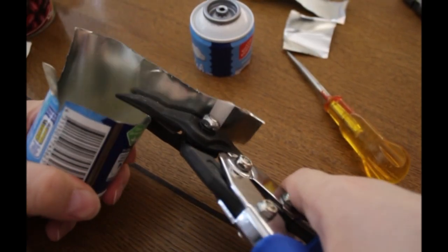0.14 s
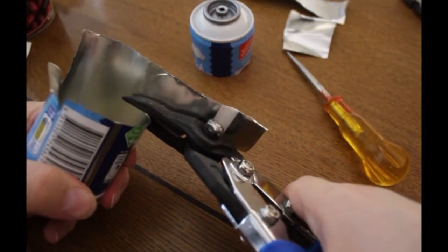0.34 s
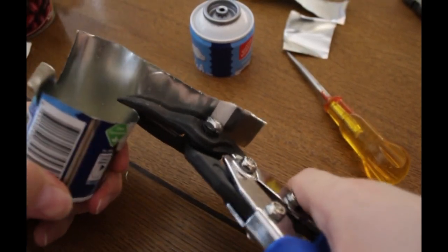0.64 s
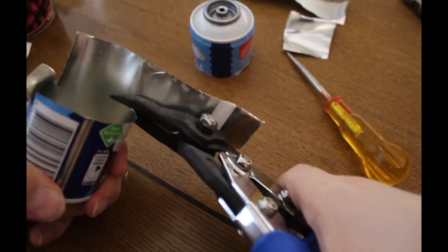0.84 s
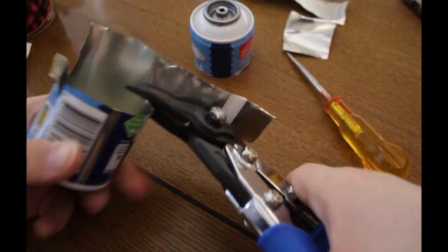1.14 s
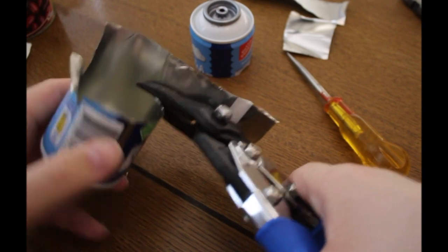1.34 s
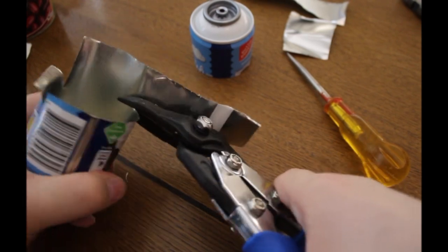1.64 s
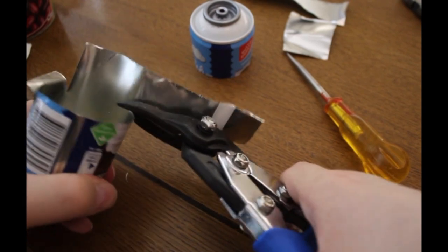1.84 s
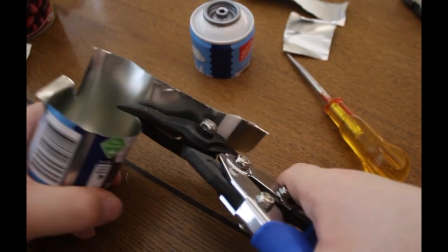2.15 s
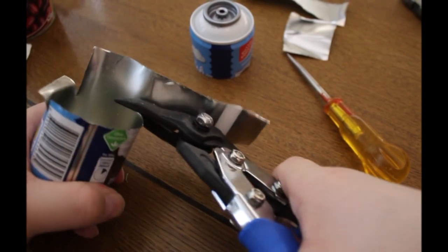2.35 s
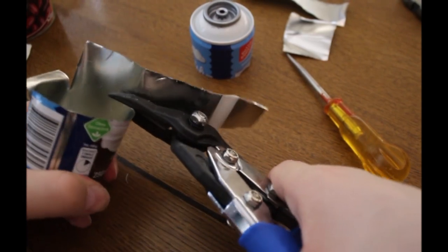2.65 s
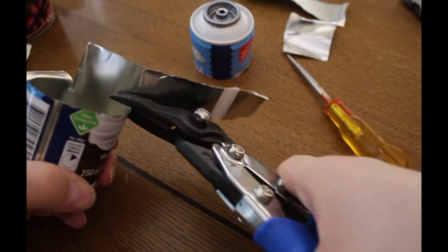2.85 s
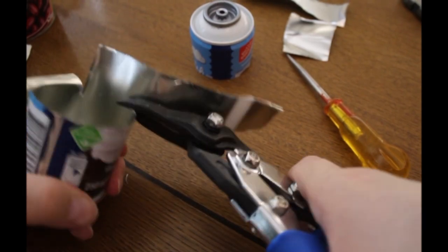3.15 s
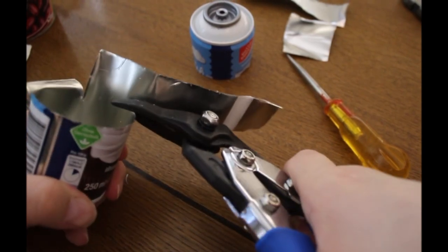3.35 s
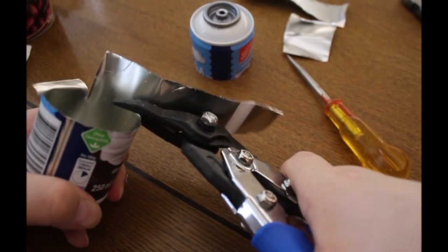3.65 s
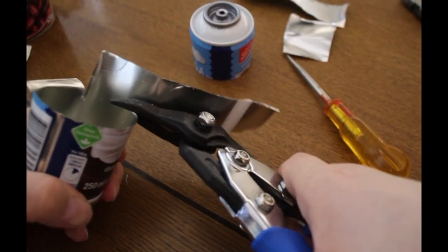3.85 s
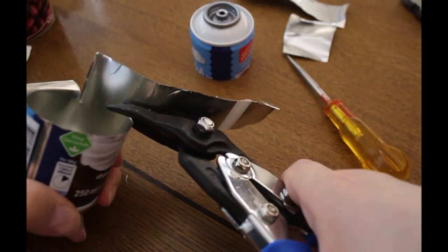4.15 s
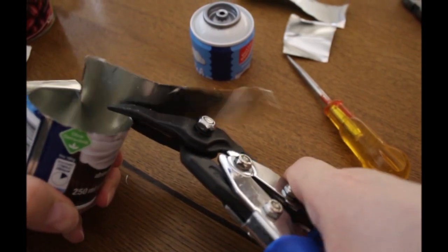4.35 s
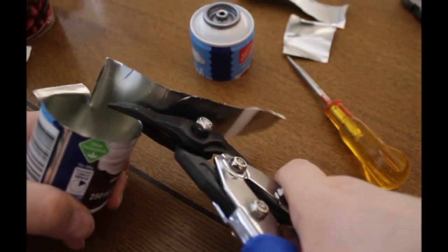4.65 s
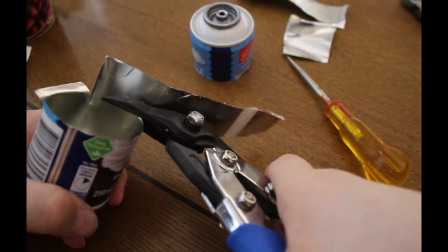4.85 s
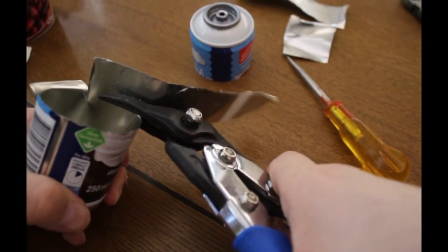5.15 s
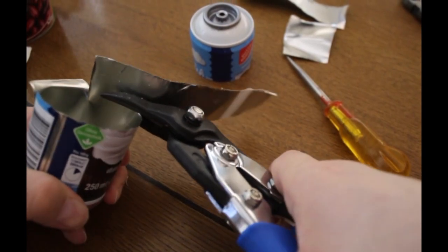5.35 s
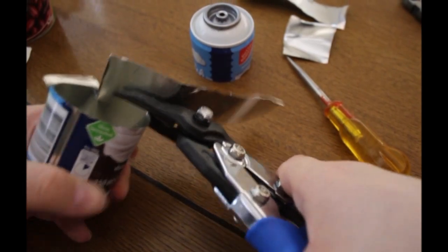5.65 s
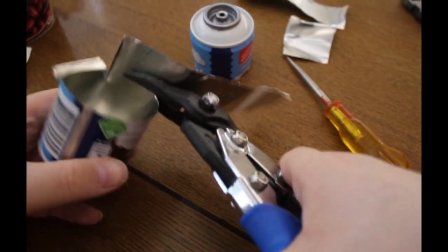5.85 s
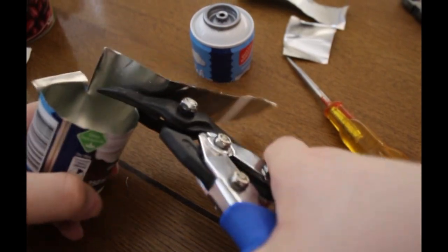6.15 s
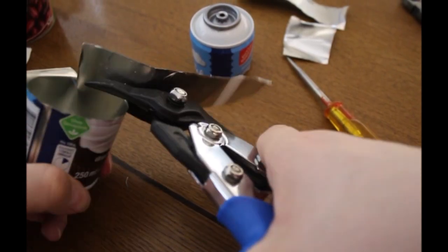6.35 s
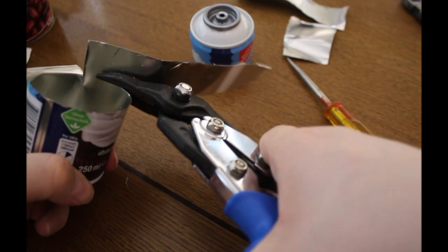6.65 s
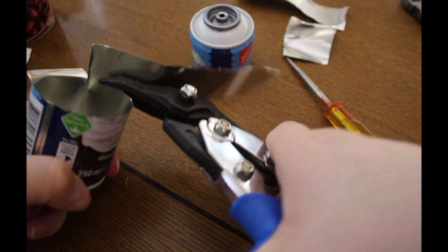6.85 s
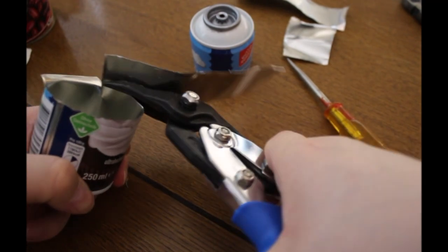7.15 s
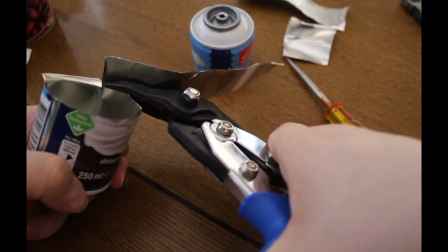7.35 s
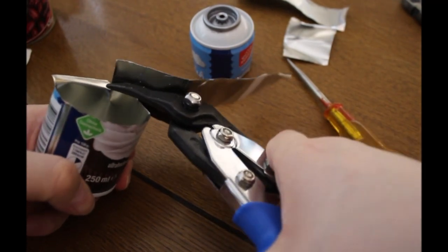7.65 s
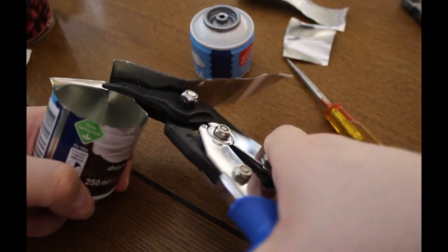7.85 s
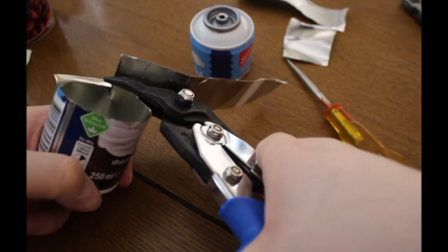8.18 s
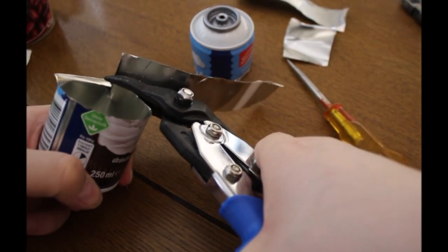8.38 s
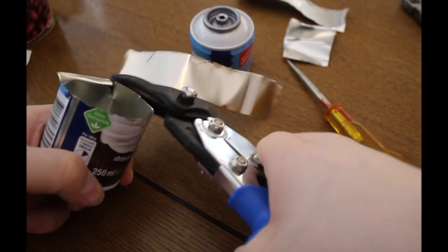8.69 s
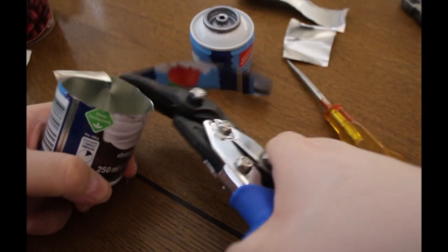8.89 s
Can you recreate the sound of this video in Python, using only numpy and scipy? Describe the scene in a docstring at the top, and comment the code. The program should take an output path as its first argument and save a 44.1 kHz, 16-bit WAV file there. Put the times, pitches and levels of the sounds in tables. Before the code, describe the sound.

Thin sheet metal buckles and tears under hand snips: damped mid-pitched tinny pops, dry crinkles and a few bright cracks, unevenly spaced. Light steel ticks and dull wooden knocks sit between. One hard metallic snap lands halfway; a last loud crack frees a strip that rattles briefly. Close stereo pickup, slightly right, short room reverberation, very quiet room tone.

```python
"""A small room, close over a wooden table: tin snips cut round the thin wall of a metal can.
A stereo microphone hears the wall pop and crunch, as damped panel tones, noise bursts and runs of slips.
The pivot ticks, the jaws snap and the table is bumped softly: struck modes with short noise.
At the end the cut strip breaks free and clatters down, its fluttering modes driven by chatter.
Rubbing on the hollow can, a short reverberation and quiet room tone lie behind the work."""
import sys
import numpy as np
from scipy import signal
from scipy.fft import rfft, irfft, next_fast_len
from scipy.io import wavfile
from scipy.ndimage import map_coordinates

SR = 44100
rng = np.random.default_rng(int(sys.argv[2]) if len(sys.argv) > 2 else 0)


def materialize(psi):
    """Save the field psi as 16-bit PCM at rate SR to the path in sys.argv[1].

    A 1-D psi becomes a single channel; in a 2-D psi each row is a channel.
    """
    bounded = np.clip(np.atleast_2d(psi).T, -1, 1)
    quanta = np.round(bounded * 32767).astype(np.int16)
    wavfile.write(sys.argv[1], SR, quanta)


N = 397782

# All levels in the tables are relative; each source sets its own balance.
# Spectrum of the room tone: pitch_hz, level_db
AIR_SPECTRUM = [(15, -38.5), (25, -22), (97, -1), (384, -4), (734, -7), (936, -10), (1890, -10.5),
                (2220, -11), (4740, -12.5), (16000, -25)]
# Width of the room tone: pitch_hz, side_db (side against mid)
AIR_WIDTH = [(60, 0.5), (240, 3.5), (950, 6.5), (3770, 2), (15000, 0.5)]
# Decay of the reverberation: pitch_hz, t60_s
ROOM_DECAY = [(200, 0.54), (600, 0.29), (1400, 0.19), (4000, 0.28), (9000, 0.26), (15000, 0.24)]
# Width of the reverberation: pitch_hz, side_db
ROOM_WIDTH = [(100, -11.5), (1000, -11.5), (3000, -5), (8000, -4.5)]
# Stereo lean of the work: pitch_hz, left_minus_right_db
STEREO_LEAN = [(100, -8.5), (600, -5.5), (1300, -4.5), (2500, -3.5), (5000, -0.5), (12000, -1)]
# Microphone response to the work: pitch_hz, gain_db
MIC_RESPONSE = [(60, -1), (300, 8), (700, 1.5), (1300, -0.5), (2200, 1), (3300, 0), (4500, -0.5), (6000, 0),
                (9500, -4.5), (12000, -7.5), (15500, -8.5)]

# How strongly the hand rubs the can: time_s, level_db
RUBBING_LEVEL = [(0.0, -66), (.31, -64), (1.48, -66.5), (1.75, -58), (4.58, -64.5), (5.51, -74.5),
                 (7.19, -59), (8.6, -100)]
# Resonances of the open can that colour the rubbing: pitch_hz, width_hz, level_db
CAN_HOLLOW = [(1312, 240, 15), (1410, 580, -8)]
# Knocks passed to the table: start_s, level_db
TABLE_BUMPS = [(.946, -55), (2.049, -53), (2.527, -53), (3.587, -56), (4.247, -55), (4.543, -49),
               (4.79, -51), (6.147, -52), (6.296, -61.5), (8.928, -60)]
# Modes of the table top: pitch_hz, level_db, t60_s
TABLE_MODES = [(124, -16, 0.22), (194, -1.5, 0.2), (265, -26, 0.083), (324, -9, 0.057), (433, 1.5, 0.086),
               (605, -10.5, 0.061), (875, -7, 0.11)]

# The opening blades slide along the cut edge, one row: start_s, end_s, level_db
BLADE_SLIDE = (2.46, 2.87, -69)
# Resonances of the sliding steel: pitch_hz, width_hz, level_db
BLADE_RESONANCES = [(2350, 190, -8), (2930, 240, 4)]
# The pivot slips as the jaws open: start_s, level_db
PIVOT_TICKS = [(1.548, -35.5), (1.568, -40), (1.634, -42.5), (1.679, -41.5), (1.743, -42), (1.804, -42.5),
               (1.834, -41.5), (1.860, -38)]
# Modes of the pivot: pitch_hz, level_db, t60_s
PIVOT_MODES = [(2996, 11, 0.024), (3590, 4, 0.08), (3870, 0, .1), (4300, -1, 0.084), (4440, -3, 0.11),
               (5500, -16, 0.11), (6020, -12, 0.16), (6900, -17, 0.1), (8250, -6, 0.16)]
# The jaws snap past each other: start_s, level_db
JAW_SNAPS = [(5.1243, -13.5)]
# Modes of the jaws: pitch_hz, level_db, t60_s
JAW_MODES = [(2160, -12, .22), (2895, -3, .1), (3120, -4, .16), (4290, -5, .16), (4930, -3, .16),
             (5240, -5, .14), (5800, -6, .13), (5960, 1, .15)]

# The loose strip brushes the blades, then scrapes and lands:
# start_s, level_db, chatter_s, most_excited_hz, rattle_db, rattle_top_hz
STRIP_CONTACTS = [(7.571, -45, .008, 2900, -4, 4980), (7.548, -47, .025, 800, -6, 3000),
                  (8.638, -41, .014, 6051, -1, 7000), (8.63, -50, 0.056, 2440, 9, 4000),
                  (8.8565, -29, .016, 4280, 5, 9000), (8.864, -24.5, .016, 2896, -5, 9000),
                  (8.927, -31.5, .014, 790, 3.5, 3960), (8.93, -32, .028, 9300, 2, 9000),
                  (8.968, -34, .04, 3700, 4, 4970)]
# Modes of the strip: pitch_hz, level_db, t60_s
STRIP_MODES = [(792, -9, .26), (2430, -3, 0.091), (2893, 1, .13), (3030, -7, .1), (3225, -7, .12),
               (3600, 2, 0.18), (3830, -3, .15), (4300, -2, 0.19), (5400, -3, .08), (6051, -1, .11),
               (6300, -10, .2), (8290, 3, .11), (10440, 4, .11)]

# Each squeeze chews through the sheet: start_s, end_s, level_db, crackle_db (against that level)
SQUEEZES = [(0.301, 0.354, -46.5, -8.5), (0.722, 0.795, -55.5, -9), (1.082, 1.164, -69, 1),
            (1.926, 2.026, -53.5, -25), (2.128, 2.186, -51.5, -15), (2.177, 2.27, -49.5, -6.5),
            (2.95, 3.039, -51.5, -8.5), (3.148, 3.267, -44, -9), (3.283, 3.348, -49.5, -10),
            (4.462, 4.589, -52, -11), (4.767, 4.867, -47, -10.5), (6.146, 6.197, -43, -10),
            (6.331, 6.644, -66.5, -6.5), (6.961, 7.029, -47, 4.5), (7.059, 7.236, -55, -2.5),
            (7.467, 7.585, -57, 1), (7.66, 7.717, -54, -2), (7.941, 8.017, -43, 3), (8.13, 8.264, -69, -10),
            (8.753, 8.852, -56, 6)]
# The wall pops, loud and faint: start_s, level_db, pitch_hz, sharpness_db (crack against panel)
WALL_POPS = [(0.1491, -7, 1200, -19.5), (.2991, -14, 1718, -16.5), (0.3106, -14, 1676, -21),
             (0.4374, -24, 1560, -23), (.354, -34, 1710, -20), (.451, -35, 1600, -20),
             (.466, -37.5, 1580, -13), (0.5579, -24.5, 1510, -20.5), (.5655, -29.5, 1515, -19.5),
             (.779, -36, 1250, -14.5), (.8048, -8.5, 1317, -1), (0.8208, -34, 1320, -11),
             (1.1782, -30, 1350, -4.5), (1.4124, -39.5, 1870, -3.5), (1.642, -25, 1500, -24),
             (1.698, -25, 1460, -24.5), (1.7638, -21.5, 1480, -25), (1.772, -27, 1460, -17),
             (1.8975, -27, 1400, 1.5), (1.923, -16.5, 1586, 0.5), (1.9578, -12, 1470, -28),
             (1.966, -25, 1390, -23), (1.982, -24.5, 1410, -21), (2.022, -34, 1300, -25),
             (2.1811, -24.5, 1264, -24), (2.1973, -19.5, 1324, -21), (2.244, -30.5, 1280, -24),
             (2.326, -45, 1248, -23), (2.407, -43.5, 1160, -19), (2.6392, -31, 1394, -25.5),
             (2.682, -39.5, 1410, -24), (2.8439, -25.5, 1290, -21.5), (2.8757, -19.5, 1314, -19.5),
             (2.8936, -22.5, 1246, -27), (2.9594, -17, 1330, -15), (2.9974, -19, 1640, -29),
             (3.1464, -25, 1342, -4.5), (3.1599, -23, 1315, 0), (3.196, -16.5, 1370, -20),
             (3.203, -20, 1400, -20), (3.218, -18, 1220, -23), (3.227, -21, 1350, -21),
             (3.251, -18, 1315, -31), (3.3638, -31.5, 1290, -18), (3.483, -30.5, 1230, -21.5),
             (3.5986, -20.5, 1345, -27), (3.6094, -25.5, 1340, -16.5), (4.027, -28.5, 1200, -8.5),
             (4.106, -24.5, 1740, -10.5), (4.125, -21, 1520, -12.5), (4.239, -14, 1320, -24),
             (4.2452, -17.5, 1397, 2.5), (4.4505, -17, 1605, -19.5), (4.5, -29, 1380, -19),
             (4.554, -31.5, 1450, -17.5), (4.611, -37.5, 1704, -16.5), (4.755, -29.5, 1643, -21.5),
             (4.7654, -22, 1310, -22), (4.797, -12, 1430, -15), (5.4118, -38, 1510, -23),
             (5.584, -29.5, 1500, -22), (5.5988, -33.5, 1480, -12.5), (5.812, -43.5, 1410, -12),
             (5.845, -40.5, 1550, -27), (6.1309, -28.5, 1620, -20), (6.14, -16.5, 1360, -47),
             (6.1481, -18.5, 1594, -8), (6.1814, -19, 1303, -20.5), (6.4973, -34, 1275, -10.5),
             (6.6005, -21.5, 1556, -16.5), (6.605, -22.5, 1575, -12.5), (6.76, -33, 1560, -14.5),
             (6.9556, -10, 1466, -1), (6.9625, -22, 1437, -12), (7.0644, -17.5, 1356, -18),
             (7.1363, -29, 1550, -20.5), (7.1699, -22, 1607, -8.5), (7.196, -30.5, 1550, -15),
             (7.2537, -32, 1460, -15.5), (7.4672, -25, 1514, -21), (7.4776, -29.5, 1390, -6.5),
             (7.5047, -26, 1410, -17), (7.519, -35, 1300, -18), (7.534, -29, 1465, -6),
             (7.5451, -31, 1400, -5.5), (7.636, -38.5, 1230, -10), (7.664, -36.5, 1360, -6),
             (7.673, -32, 1720, -20), (7.6888, -20, 1303, -24), (7.698, -28, 1280, -16),
             (7.7733, -35, 1304, -24), (7.898, -32.5, 1697, -25), (7.909, -33, 1550, -4),
             (7.926, -32.5, 1390, -18), (7.94, -19, 1575, -6.5), (7.9615, -19.5, 1253, -5.5),
             (8.0457, -26.5, 1711, -19.5), (8.403, -40, 1550, -20), (8.428, -40, 1410, -22),
             (8.444, -36, 1536, -22), (8.7429, -9.5, 1717, -2.5), (8.83, -30, 1770, -20)]
# Modes of the can: pitch_hz, level_db, t60_s
WALL_MODES = [(814, -3.5, 0.19), (1185, -3, 0.22), (1280, -5, 0.28), (1417.5, 1.5, 0.088), (1745, -4, 0.18),
              (2480, -12.5, 0.187), (2805, 0, 0.24), (3340, 5, 0.22), (3790, 7, .17)]
# How freely the holding hand lets the can ring: time_s, ring_db
HAND_FREEDOM = [(.15, 4), (.45, -4.5), (.8, -1.5), (1.18, 19), (1.6, 3), (6.15, 4), (7, 6), (8.75, 3.5)]

# Crinkles, the small buckles within a squeeze
CRINKLE_RATE = 35  # per second of squeezing
CRINKLE_DB, CRINKLE_SPREAD_DB = 14.5, 3.5  # over the level of the squeeze
CRINKLE_HZ, CRINKLE_SPREAD_OCT = 1437, 0.15  # panel pitch
CRINKLE_SHARP_DB = -11  # sharpness over the crackle of the squeeze

# Strain and tear around a sharp pop; levels against the pop
TEAR_SHARP_DB = -5  # sharpness above which a pop tears the sheet
STRAIN_S, STRAIN_DB, STRAIN_CRACKLE_DB = 0.027, -43, -6.5
TEAR_DELAY_S, TEAR_S, TEAR_DB, TEAR_CRACKLE_DB = 0.012, 0.11, -43.5, -2

EDGE_KNEE_DB = -12.5  # sharpness from which the blade edge speaks fully
PUSH_HZ, PUSH_DB_PER_OCT = 1420, -17  # panels above this pitch push less air
TOP_HZ = 16000  # band limit
T = np.arange(SR * 2 // 5) / SR  # time within one hit, s


def amp(db):
    """Decibels to gain."""
    return 10 ** (np.asarray(db) / 20)


def unit(x):
    """Scale to rms 1."""
    return x / np.sqrt(np.mean(x ** 2) + 1e-20)


def along(points, hz):
    """Read (Hz, value) points on a log frequency axis."""
    f, v = np.transpose(points)
    return np.interp(np.log(hz + 1), np.log(f), v)


def fade(t60, t=T):
    """Exponential decay, 60 dB down after t60 seconds."""
    return np.exp(-np.log(1000) * t / t60)


def add(track, s, sound):
    """Mix a sound into a track at time s."""
    part = track[max(round(s * SR), 0):][:len(sound)]
    part += sound[:len(part)]


def filtered(x, response):
    """Multiply the spectrum of x by a response of frequency."""
    m = next_fast_len(N + SR // 2)
    return irfft(rfft(x, m) * response(np.fft.rfftfreq(m, 1 / SR)), m)[..., :N]


def band(x, lo_hz, hi_hz, order=2):
    """Causal band-pass."""
    edges = [lo_hz, min(hi_hz, SR / 2 - 100)]
    return signal.sosfilt(signal.butter(order, edges, 'band', fs=SR, output='sos'), x)


def bursts(lo_hz, hi_hz, t60, count, order=2):
    """Rows of dying band noise, each starting near rms 1."""
    shape = fade(t60)[:SR // 10]
    noise = band(rng.standard_normal((count, len(shape))) * shape, lo_hz, hi_hz, order=order)
    return noise * np.linalg.norm(shape) / np.linalg.norm(noise, axis=1, keepdims=True)


def ring(modes, scatter_db=2, pitch_scatter=0.0015):
    """An object's modes, struck at new strengths, each pitch varied slightly at random."""
    hz, db, t60 = np.transpose(modes)[..., None]
    gain = amp(db + scatter_db * rng.standard_normal(hz.shape)) * rng.choice([-1, 1], hz.shape)
    hz = hz * (1 + pitch_scatter * rng.standard_normal(hz.shape))
    tones = np.sin(np.float32(2 * np.pi * hz * T))
    return np.sum(gain * tones * fade(t60), axis=0)


def near(modes, centre_hz, focus_db):
    """Modes lose focus_db for each octave away from the excited pitch."""
    return [(hz, db - focus_db * abs(np.log2(hz / centre_hz)), t60) for hz, db, t60 in modes]


def resonances(peaks, f):
    """Causal response of (Hz, width Hz, dB) peaks."""
    return sum(amp(db) * 1j * f * w / (c * c - f * f + 1j * f * w) for c, w, db in peaks)


def slips(length, rate, spread_db, taper=0.248):
    """A run of tiny irregular impulses with soft ends, rms 1."""
    n = max(int(length * SR), 64)
    hits = rng.random(n) < rate / SR
    hits[n // 2] = True  # at least one slip
    signs = rng.choice([-1, 1], n)
    sizes = amp(spread_db * rng.standard_normal(n))
    return unit(hits * signs * sizes * signal.windows.tukey(n, taper))


def driven(force, response):
    """A body's answer to a force, at the force's energy."""
    sound = signal.fftconvolve(force, response)
    return sound * np.linalg.norm(force) / np.linalg.norm(sound)


def waver(rate, depth_db):
    """A smooth random gain over one hit, with rate knots a second."""
    knots = rng.standard_normal(int(T[-1] * rate) + 4)
    return amp(depth_db * map_coordinates(knots, [T * rate]))


def room_tone(mid_db=-66):
    """Steady quiet air and hiss: shaped noise, independent in mid and side."""
    noise = rng.standard_normal((2, N))
    mid, side = unit(filtered(noise, lambda f: amp(along(AIR_SPECTRUM, f))))
    side = filtered(side, lambda f: amp(along(AIR_WIDTH, f)))
    return amp(mid_db) * np.array([mid + side, mid - side])


def room(x, early_db=5, early_side_db=-2, early_t60=0.082, gap_s=0.0021, count=45):
    """Table and walls answer with decaying noise tails, narrow at first and wider later."""
    out = np.zeros((2, N))  # mid, side
    early = amp([[early_db], [early_side_db]]) * fade(early_t60)
    onset = np.clip(T / gap_s - 1, 0, 1) * (1 + early)
    for piece in np.array_split(np.arange(N), count):  # a new random tail for each equal stretch of time
        hz, t, z = signal.stft(rng.standard_normal((2, len(T))), SR, nperseg=256)
        decay = fade(along(ROOM_DECAY, hz)[:, None], t)
        tails = signal.istft(z * decay, SR, nperseg=256)[1][:, :len(T)] * onset
        for track, tail in zip(out, tails):
            add(track, piece[0] / SR, signal.fftconvolve(x[piece], tail / np.linalg.norm(tail)))
    side = filtered(out[1], lambda f: amp(along(ROOM_WIDTH, f)))
    return np.array([out[0] + side, out[0] - side])


def rubbing(level_db=-5):
    """Fingers and blades rub faintly on the hollow can: noise through its resonances."""
    db = np.interp(np.arange(N) / SR, *np.transpose(RUBBING_LEVEL))
    noise = filtered(rng.standard_normal(N), lambda f: resonances(CAN_HOLLOW, f))
    return amp(db + level_db) * unit(noise)


def table(wood_db=-4, thud_db=-2):
    """Soft contacts give a broad thud and briefly ring the table top."""
    out = np.zeros(N)
    thuds = bursts(260, 760, 0.14, count=len(TABLE_BUMPS))
    for (s, db), thud in zip(TABLE_BUMPS, thuds):
        soft_start = 1 - fade(0.022)
        add(out, s, amp(db + wood_db) * ring(TABLE_MODES) * soft_start)
        add(out, s, amp(db + thud_db) * thud)
    return out


def sliding(rate=1800, spread_db=3):
    """Fine slips of a blade along the cut edge sound the steel's resonances."""
    start, end, db = BLADE_SLIDE
    force = np.zeros(N)
    add(force, start, amp(db) * slips(end - start, rate, spread_db))
    sound = filtered(force, lambda f: resonances(BLADE_RESONANCES, f))
    return sound * np.linalg.norm(force) / np.linalg.norm(sound)


def pivot_ticks(ring_db=-13, crack_db=-7.5):
    """Steel slips on steel at the pivot: a short crack and the tool's ring."""
    out = np.zeros(N)
    cracks = bursts(1100, 9400, 0.035, count=len(PIVOT_TICKS))
    for (s, db), crack in zip(PIVOT_TICKS, cracks):
        add(out, s, amp(db + ring_db) * ring(PIVOT_MODES))
        add(out, s, amp(db + crack_db) * crack)
    return out


def jaw_snaps(ring_db=-22, clack_db=-3, crack_db=-5, zing_db=-15):
    """The snapping blades crack, clack and ring; their crowded modes leave a noisy zing."""
    out, count = np.zeros(N), len(JAW_SNAPS)
    cracks = bursts(3940, 14000, 0.056, count=count, order=1)
    clacks = bursts(4800, 6000, 0.018, count=count, order=3)
    zings = bursts(4800, 6040, 0.1, count=count, order=4)
    for (s, db), crack, clack, zing in zip(JAW_SNAPS, cracks, clacks, zings):
        add(out, s, amp(db + ring_db) * ring(JAW_MODES, scatter_db=4))
        noise = amp(crack_db) * crack + amp(clack_db) * clack + amp(zing_db) * zing
        add(out, s, amp(db) * noise)
    return out


def strip(ring_db=-3, rattle_db=-5, body_db=-17, focus_db=10, focus_oct=.09, far_db=5,
          rate=1500, flutter_rate=170, flutter_db=3):
    """The strip chatters; where it touches decides which mode leads, and flexing makes each flutter."""
    out = np.zeros(N)
    for s, db, length, centre_hz, rattle, top_hz in STRIP_CONTACTS:
        sheet, = bursts(1640, top_hz, 0.042, count=1, order=1)
        body, = bursts(700, 2200, 0.049, count=1, order=3)
        force = amp(db) * slips(length, rate, spread_db=4.5)
        tone = 0
        for mode in near(STRIP_MODES, centre_hz, far_db):
            octaves_off = np.log2(mode[0] / centre_hz)
            lead = amp(focus_db * np.exp(-(octaves_off / focus_oct) ** 2))
            tone = tone + lead * ring([mode], scatter_db=0) * waver(flutter_rate, flutter_db)
        tone = tone * (1 - fade(2 * length))  # builds while the chatter lasts
        add(out, s, amp(ring_db) * tone * np.linalg.norm(force) / np.linalg.norm(tone))
        bend = amp(body_db) * np.sqrt(3000 / centre_hz)  # broad, low contacts bend the whole strip
        rattling = amp(rattle_db) * driven(force, sheet) + bend * driven(force, body)
        add(out, s, amp(rattle) * rattling)
    return out


def tears():
    """Around each of the sharpest pops the sheet strains, then tears on; rows as in SQUEEZES."""
    rows = []
    for s, db, hz, sharp in WALL_POPS:
        if sharp > TEAR_SHARP_DB:
            rows.append((s - STRAIN_S, s, db + STRAIN_DB, STRAIN_CRACKLE_DB))
            start = s + TEAR_DELAY_S
            rows.append((start, start + TEAR_S, db + TEAR_DB, TEAR_CRACKLE_DB))
    return rows


def cutting(cuts, rate=220, spread_db=5, crackle_rate=1500, crackle_spread_db=4,
            body_db=-2, push_db=-9, edge_db=-2, crackle_db=-5):
    """Shearing is a run of slips that shake the wall, with a much finer crackle at the blade."""
    out, count = np.zeros(N), len(cuts)
    bodies = bursts(1114, 1850, 0.011, count=count, order=3)
    pushes = bursts(483, 1045, 0.0069, count=count, order=3)
    edges = bursts(2630, 6100, 0.009, count=count)
    cracks = bursts(3600, 13500, 0.0042, count=count)
    for (start, end, db, crackle), body, push, edge, crack in zip(cuts, bodies, pushes, edges, cracks):
        force = amp(db) * slips(end - start, rate, spread_db)
        fine = amp(db + crackle) * slips(end - start, crackle_rate, crackle_spread_db)
        add(out, start, amp(body_db) * driven(force, body) + amp(push_db) * driven(force, push))
        add(out, start, amp(edge_db) * driven(fine, edge) + amp(crackle_db) * driven(fine, crack))
    return out


def crinkles():
    """Every squeeze buckles the wall in small pops at uneven moments; rows as in WALL_POPS."""
    rows = []
    for start, end, db, crackle in SQUEEZES:
        count = max(round((end - start) * CRINKLE_RATE), 1)
        times = start + (end - start) * (np.arange(count) + rng.random(count)) / count
        for s, (size, pitch) in zip(times, rng.standard_normal((count, 2))):
            level = db + CRINKLE_DB + CRINKLE_SPREAD_DB * size
            hz = CRINKLE_HZ * 2 ** (CRINKLE_SPREAD_OCT * pitch)
            rows.append((s, level, hz, crackle + CRINKLE_SHARP_DB))
    return rows


def wall_pops(pops, panel_t60=0.016, flex_db=-13, flex_oct=.37, ring_db=-25, focus_db=22,
              edge_db=-6.0, crack_db=-3, push_db=-22, glint_db=-2):
    """Each pop flips a panel damped by the hand; the edge cracks and the can's nearest modes ring on."""
    out, count = np.zeros(N), len(pops)
    edges = bursts(2500, 4200, 0.013, count=count, order=3)
    cracks = bursts(4780, 10400, 0.017, count=count, order=3)
    glints = bursts(8800, 15500, 0.021, count=count)
    pushes = bursts(593, 1017, 0.026, count=count, order=3)
    t = T[:edges.shape[1]]
    for i, (s, db, hz, sharp) in enumerate(pops):
        panel = np.sin(2 * np.pi * hz * t) * fade(panel_t60, t) * (1 - fade(0.0044, t))
        # the sheet around it flexes between the panel's pitch and the crinkles' usual one
        centre = np.sqrt(hz * CRINKLE_HZ)
        flex, = bursts(centre / 2 ** flex_oct, centre * 2 ** flex_oct, 0.027, count=1, order=3)
        push_gain = amp(push_db + PUSH_DB_PER_OCT * max(np.log2(hz / PUSH_HZ), 0))
        sheet = panel + amp(flex_db) * flex + push_gain * pushes[i]
        # the hardest cracks are also the brightest
        glint = amp(glint_db + 2 * np.clip(sharp, -3, 3)) * glints[i]
        edge = amp(edge_db + min(sharp - EDGE_KNEE_DB, 0)) * edges[i]
        tear = edge + amp(crack_db + sharp) * (cracks[i] + glint)
        freedom = np.interp(s, *np.transpose(HAND_FREEDOM))
        after = amp(ring_db + freedom) * ring(near(WALL_MODES, hz, focus_db), scatter_db=3.5)
        add(out, s, amp(db) * (sheet + tear))
        add(out, s, amp(db) * after)
    return out


def scene(wet_db=-4, lag_s=-0.000024, lag_fades_hz=10000):
    """The work, close to the microphones and louder on the right, with its reverberation and room tone."""
    work = rubbing() + table() + sliding() + pivot_ticks() + jaw_snaps() + strip()
    work = work + cutting(SQUEEZES + tears()) + wall_pops(WALL_POPS + crinkles())
    sides = np.array([[1], [-1]]) / 2  # left, right

    def place(f):
        """Microphone colour, level lean and a small lag between the sides that fades in the treble."""
        gain = amp(along(MIC_RESPONSE, f) + sides * along(STEREO_LEAN, f))
        delay = lag_s * sides / (1 + (f / lag_fades_hz) ** 2)  # negative lag: left first
        return gain * np.exp(-2j * np.pi * f * delay)

    return filtered(work + amp(wet_db) * room(work), place) + room_tone()


def record(dry):
    """The microphone chain cuts steeply above its band limit."""
    return filtered(dry, lambda f: 1 / np.sqrt(1 + (f / TOP_HZ) ** 120))


dry = scene()
out = record(dry)
materialize(out)
```